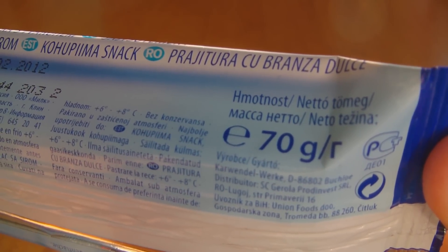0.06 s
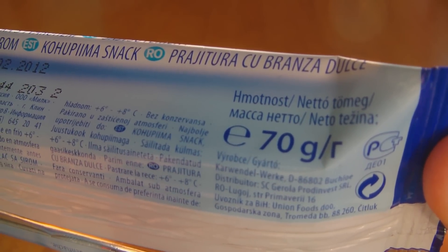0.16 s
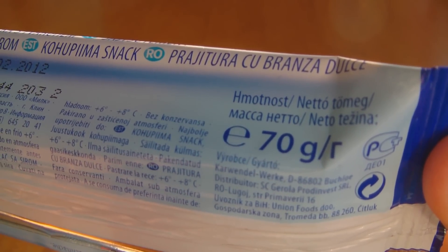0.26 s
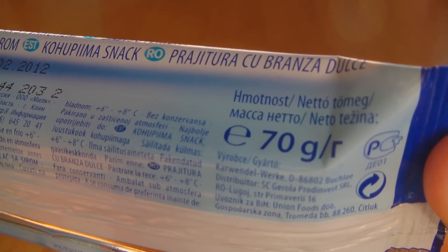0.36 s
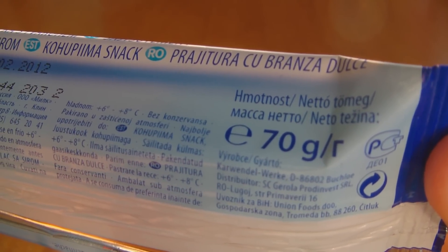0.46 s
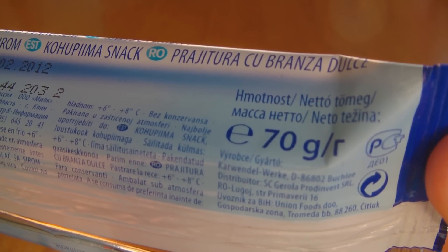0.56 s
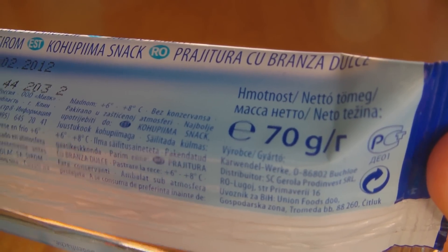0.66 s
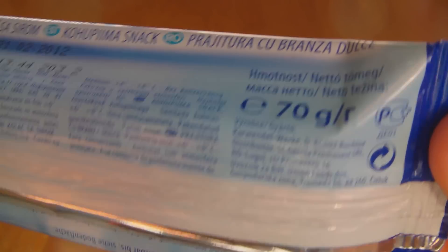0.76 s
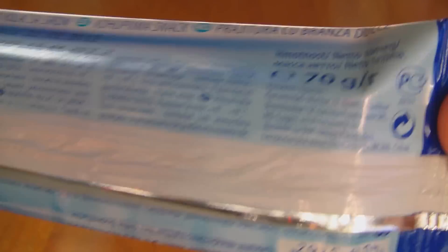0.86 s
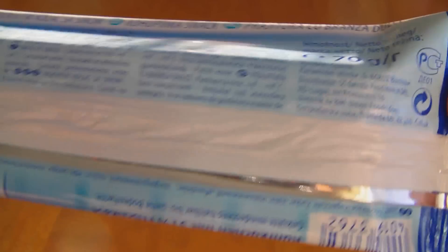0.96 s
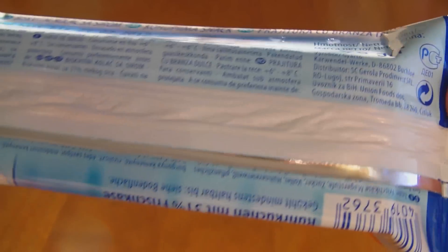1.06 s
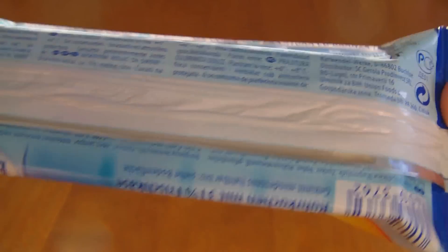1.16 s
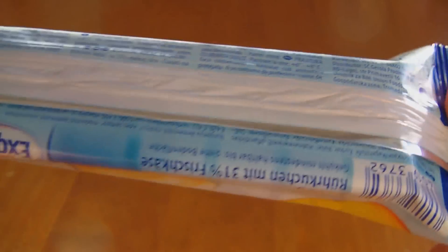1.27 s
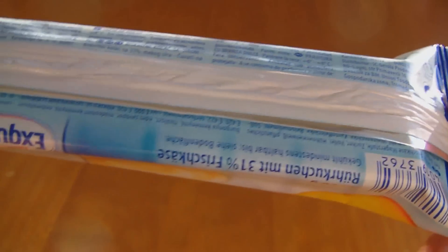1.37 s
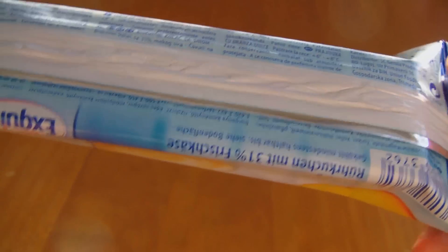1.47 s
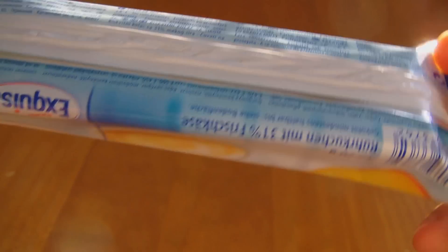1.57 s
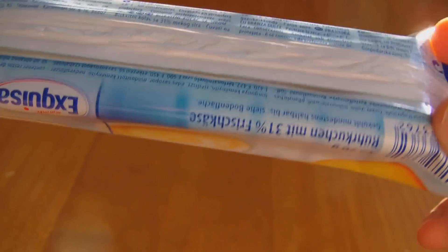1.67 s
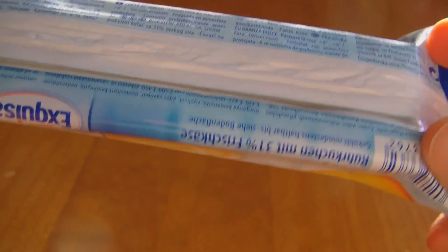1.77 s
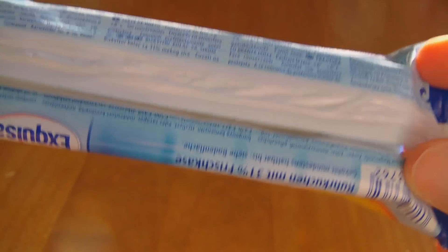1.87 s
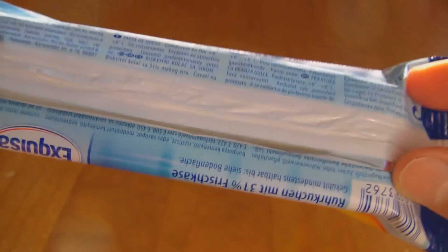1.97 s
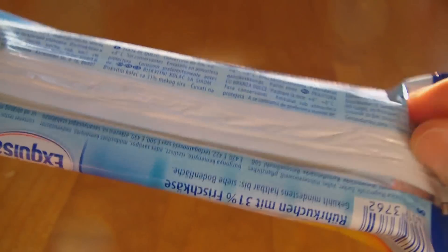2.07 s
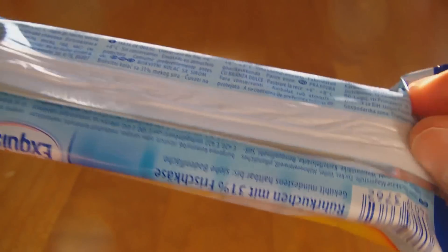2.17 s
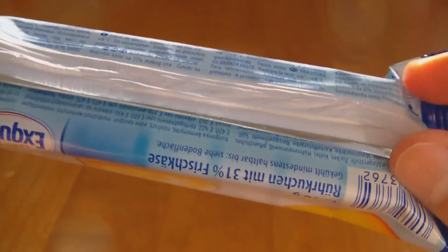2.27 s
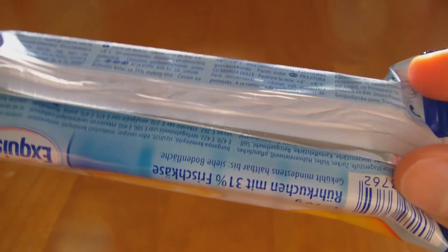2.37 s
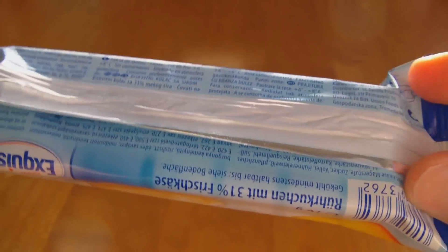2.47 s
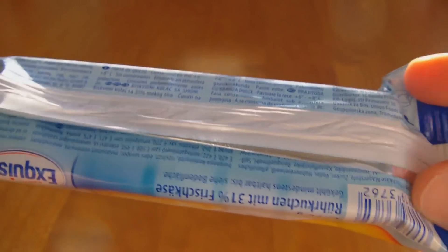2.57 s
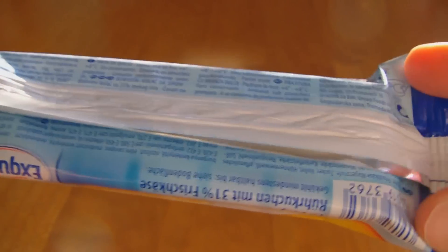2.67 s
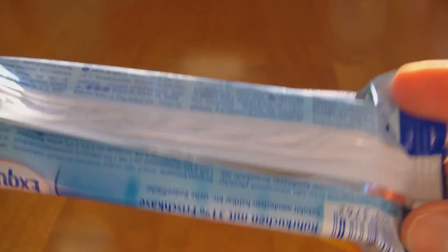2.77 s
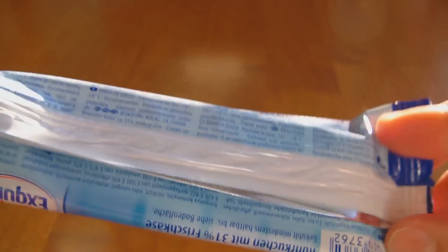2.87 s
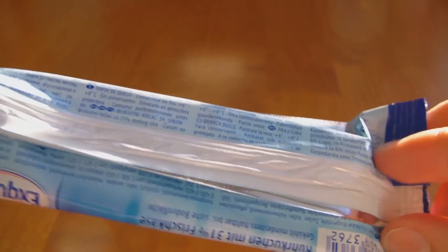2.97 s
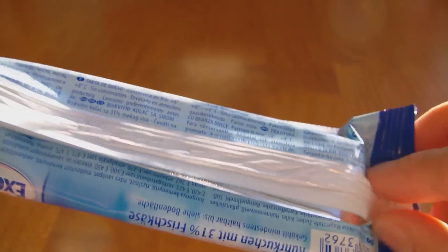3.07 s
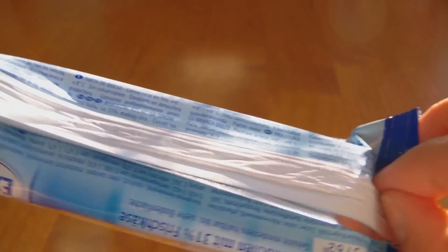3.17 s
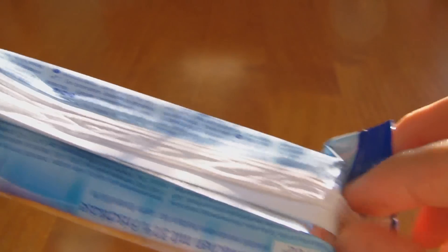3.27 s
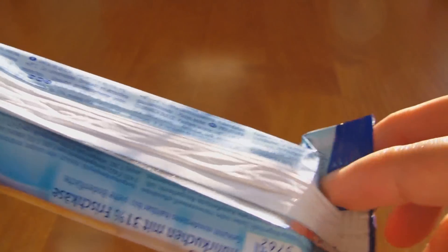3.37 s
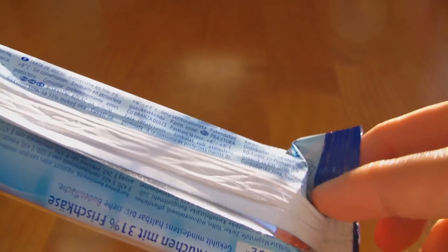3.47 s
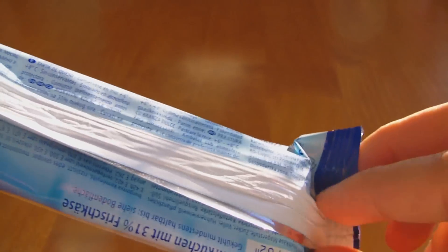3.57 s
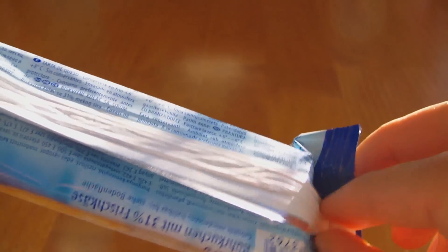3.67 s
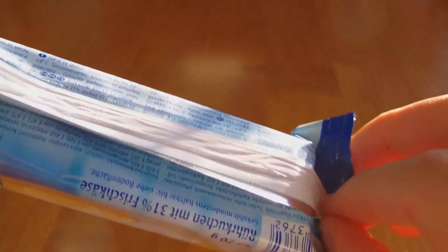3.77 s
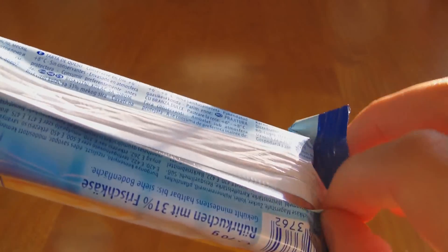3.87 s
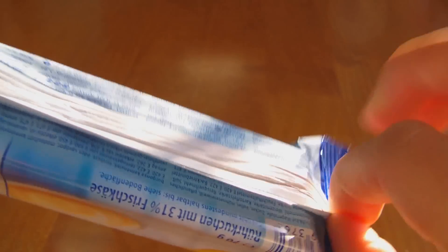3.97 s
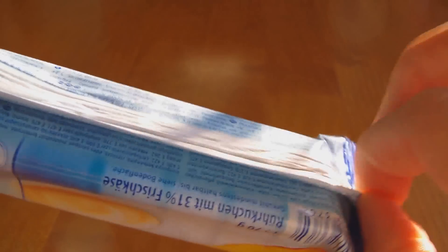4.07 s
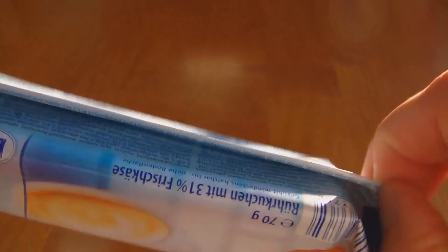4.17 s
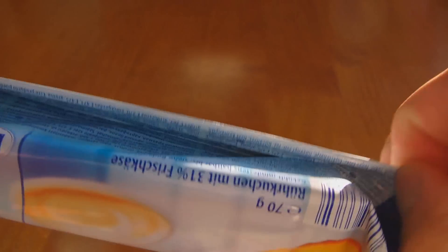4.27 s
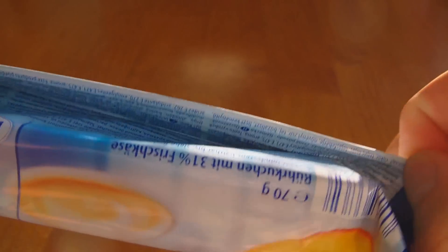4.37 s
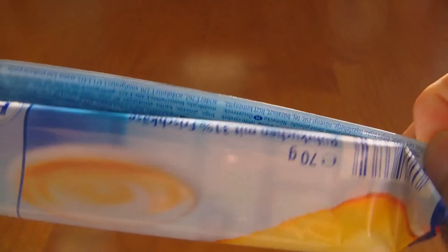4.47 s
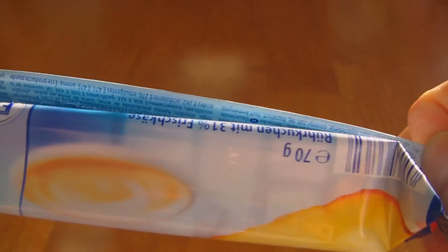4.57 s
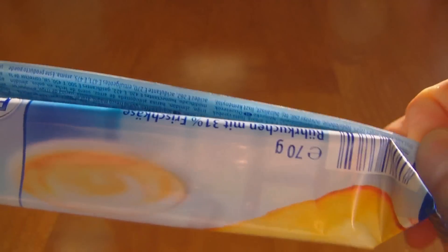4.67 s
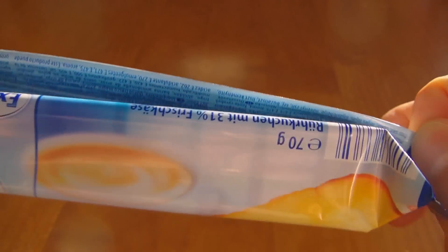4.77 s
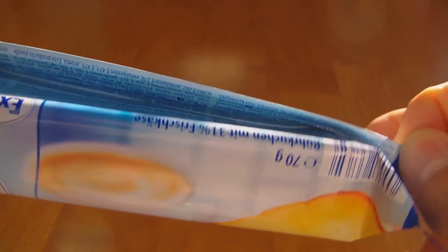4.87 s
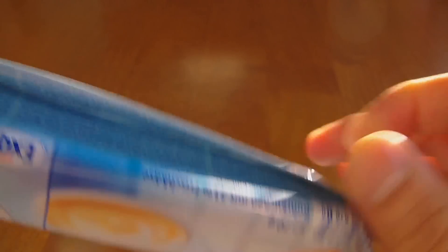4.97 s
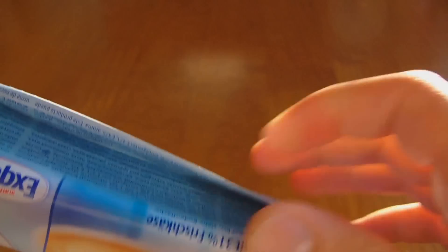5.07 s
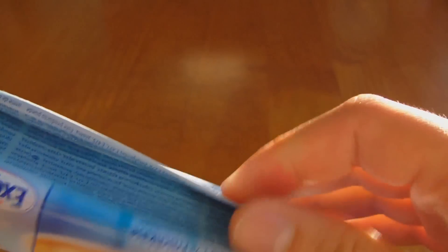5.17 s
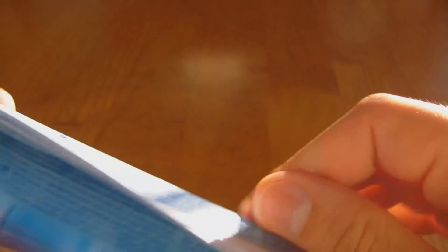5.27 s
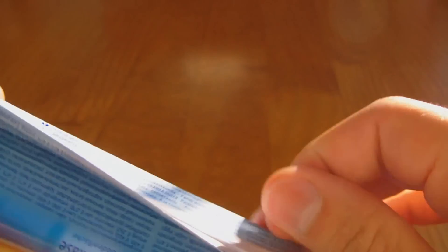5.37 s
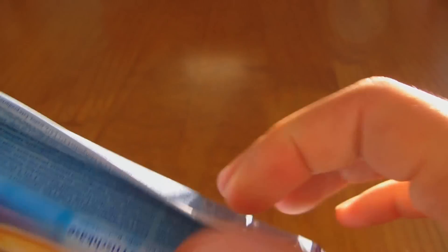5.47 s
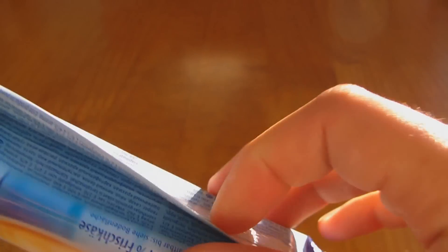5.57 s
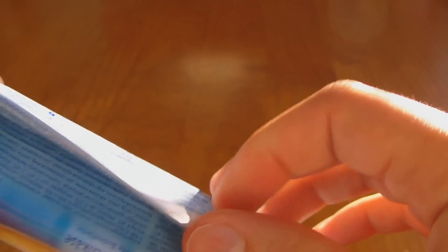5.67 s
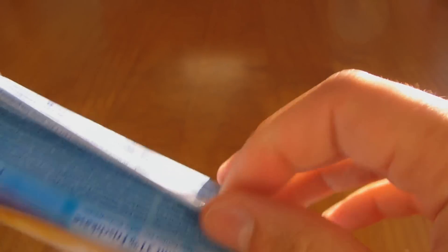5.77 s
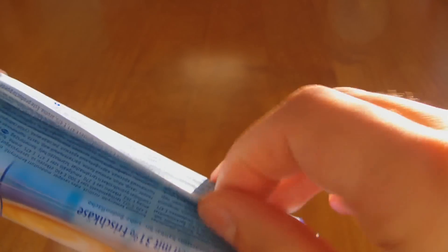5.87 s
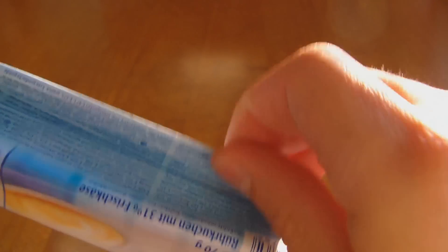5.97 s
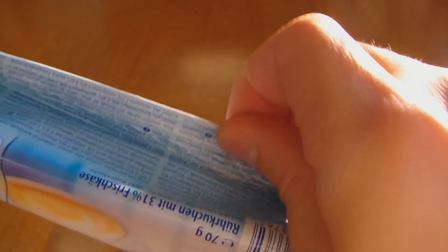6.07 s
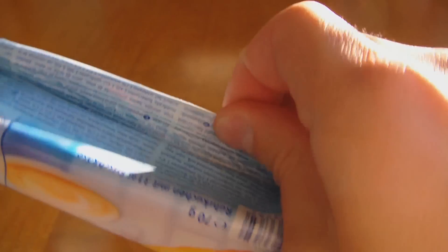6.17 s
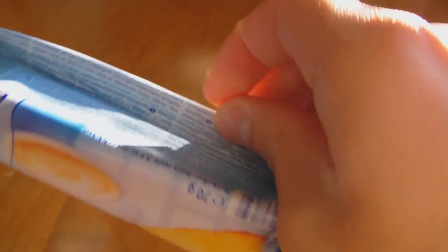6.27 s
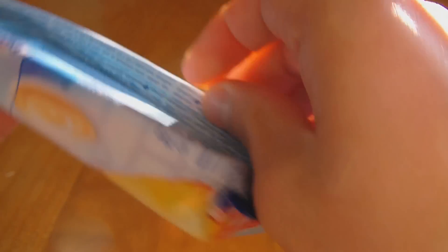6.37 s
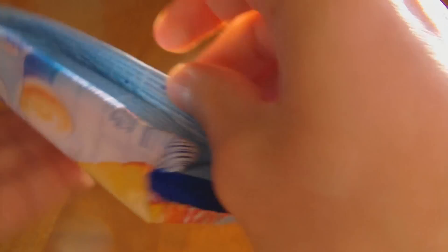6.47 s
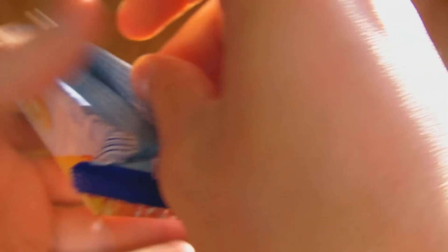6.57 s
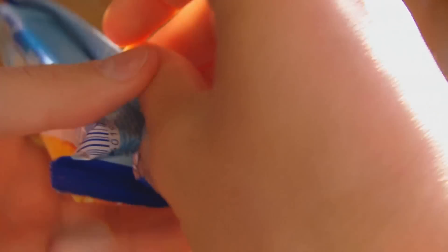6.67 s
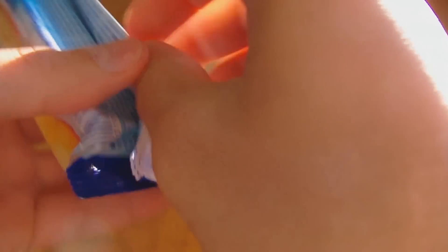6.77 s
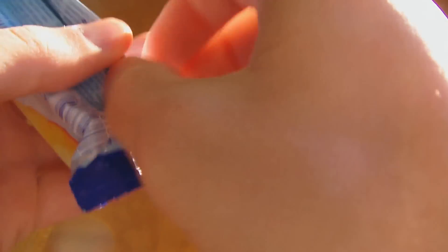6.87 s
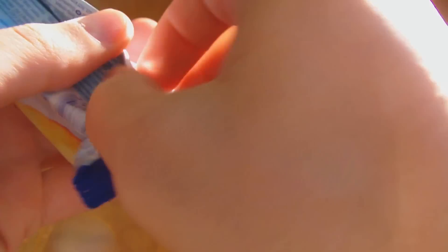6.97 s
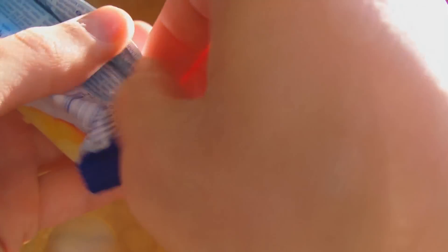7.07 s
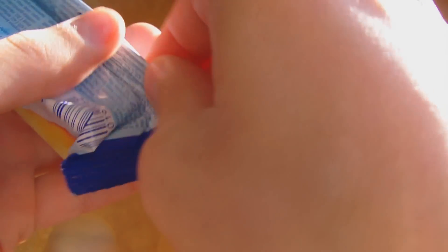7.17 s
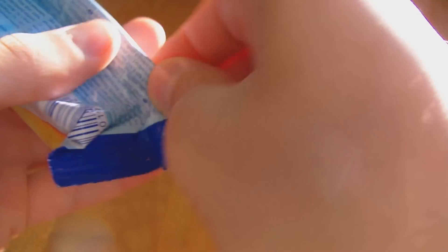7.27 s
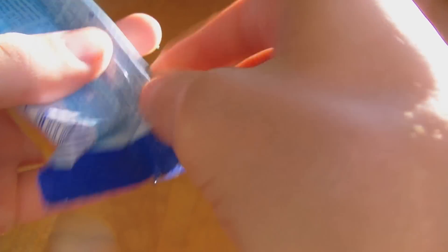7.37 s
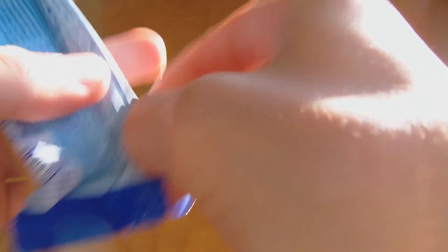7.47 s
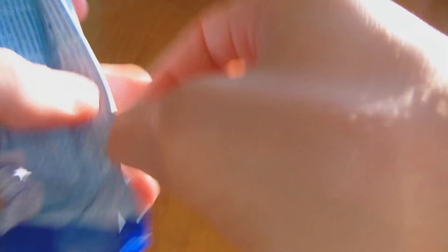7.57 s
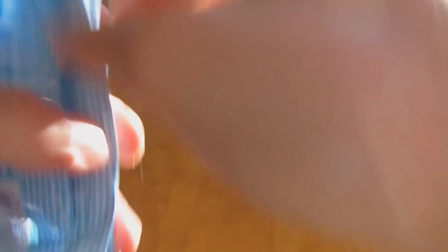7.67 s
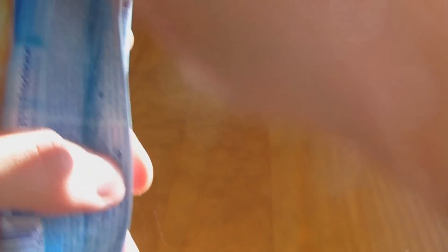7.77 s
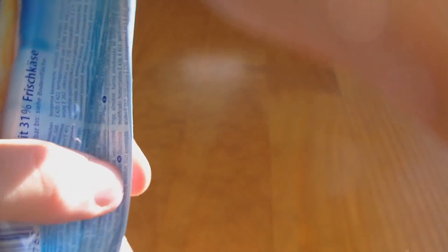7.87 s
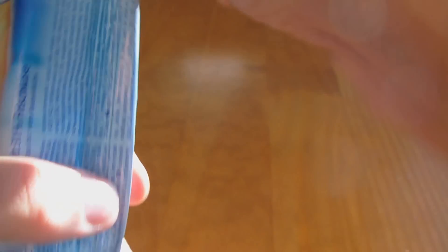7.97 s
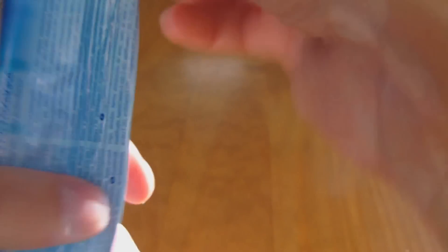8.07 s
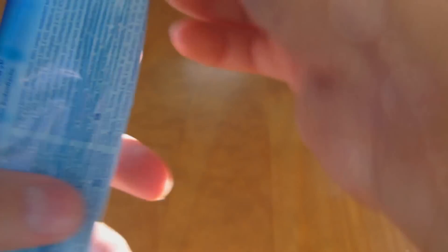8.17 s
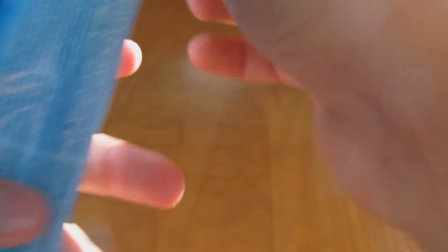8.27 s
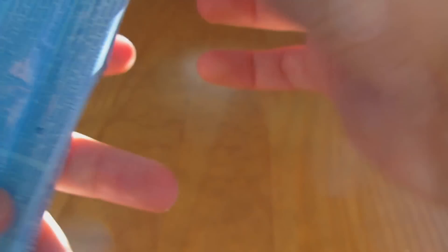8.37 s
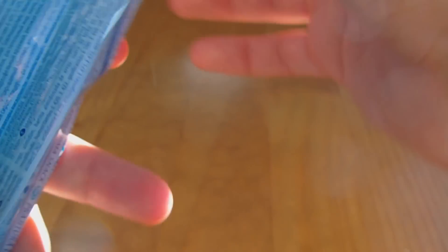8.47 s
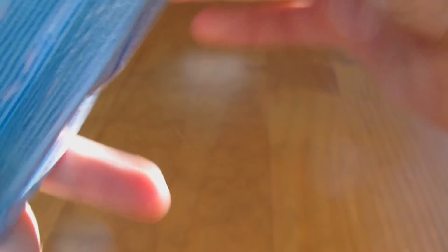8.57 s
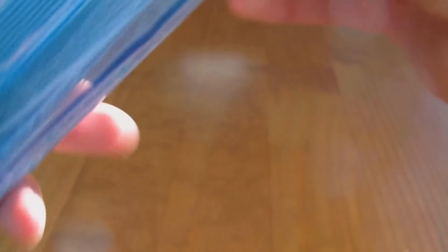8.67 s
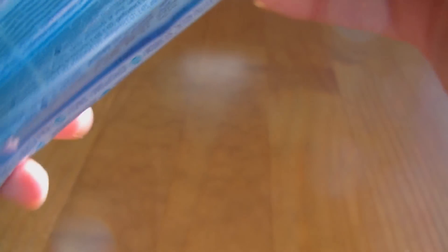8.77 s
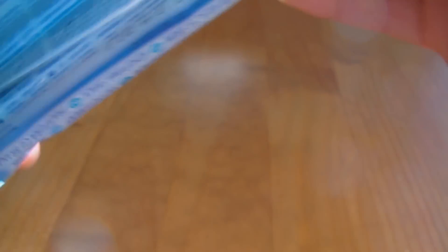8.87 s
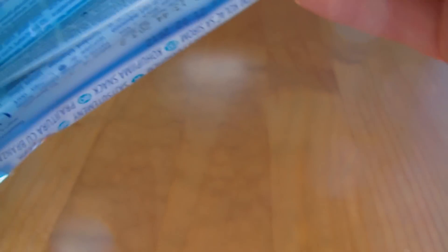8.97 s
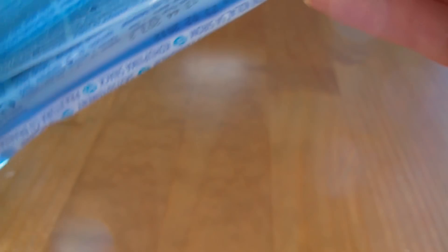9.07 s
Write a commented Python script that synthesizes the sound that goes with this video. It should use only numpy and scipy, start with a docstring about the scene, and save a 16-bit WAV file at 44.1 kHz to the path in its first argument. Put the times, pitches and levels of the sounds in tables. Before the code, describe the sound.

A stiff plastic snack wrapper is turned over by hand, close to the microphone in a quiet room. The first second holds only faint hiss and a tiny tap at 0.5 seconds. From 1 second, creases buckle in sharp, irregular snaps, over a soft rustle of sliding fingers with many tiny ticks. The snaps bunch between 2 and 2.5 seconds, then thin to lighter crackles. A dense, louder flurry runs from 4 to 4.6 seconds, with faint low thumps beneath. Scattered crinkles follow, with a soft thump at 5.3 seconds and small clusters around 5.6, 6.1 and 7.3 seconds. Another soft thump near 7.9 seconds leads into busy crackling around 8.1 and 8.7 seconds, ending in a few light ticks just after 9 seconds. Slight room reflections and a barely audible low hum remain throughout.

```python
"""A stiff plastic snack wrapper, turned over by hand close to a microphone in a quiet room.
Creases buckle with sharp snaps: bursts of slips ring the film's facets and the air-filled pouch.
Sliding fingers rustle with skin hiss and many tiny ticks; a faint tap and low thumps lie underneath.
The walls send a little back, over room and microphone hiss and a faint low hum."""
import sys
import numpy as np
from scipy import signal
from scipy.fft import rfft, irfft
from scipy.io import wavfile
from scipy.ndimage import uniform_filter1d

SR = 44100
rng = np.random.default_rng(int(sys.argv[2]) if len(sys.argv) > 2 else 0)


def inscribe(sig):
    """Save sig as 16-bit PCM at rate SR to the path in sys.argv[1].

    A 1-D sig is mono; a 2-D sig holds one channel per row.
    Samples are clipped to [-1, 1] before scaling.
    """
    pcm = np.round(np.clip(np.atleast_2d(sig).T, -1, 1) * 32767)
    wavfile.write(sys.argv[1], SR, pcm.astype(np.int16))


N = 402633
SNAP_RISE_S = 0.00015


def gain_of(db):
    """dB to amplitude."""
    return 10 ** (np.asarray(db) / 20)


def unit_rms(x):
    """Scale to rms 1."""
    return x / np.sqrt(np.mean(x ** 2) + 1e-20)


def curve_at(points, hz):
    """Interpolate (Hz, value) points over log frequency."""
    point_hz, value = np.transpose(points)
    return np.interp(np.log(hz + 1), np.log(point_hz + 1), value)


def add(mix, start_s, sound):
    """Mix a sound in at start_s."""
    part = mix[round(start_s * SR):][:len(sound)]
    part += sound[:len(part)]


def octaves(hz):
    """Octaves above 3 kHz, limited to the film's range."""
    return np.log2(np.clip(hz, 120, 15000) / 3000)


def minimum_phase(db):
    """Causal spectrum for a gain curve in dB."""
    log_gain = np.log(gain_of(db))
    mirrored = np.concatenate([log_gain, log_gain[..., -2:0:-1]], -1)
    return np.exp(log_gain - 1j * signal.hilbert(mirrored).imag[..., :log_gain.shape[-1]])


def mode(hz, centre_hz, width_hz):
    """Response of one damped mode, 1 at its peak."""
    return 1 / (1 + 2j * (hz - centre_hz) / width_hz)


def buckle(ring_hz, fall_db_per_oct, rise_s):
    """Slips ring facets and pouch. One snap a row, each with the energy of 1 ms at rms 1."""
    # Colour of an average snap. Each row: frequency in Hz, level in dB.
    film_colour = [(80, -47), (300, -19), (640, -7.5), (1010, -6.5), (1610, -4), (2560, -1), (4070, -2),
                   (6460, -6), (10280, -13.5), (15000, -20), (15500, -38.5)]
    # Mode of the air-filled wrapper. Each row: centre in Hz, width in Hz, mean coupling in dB.
    pouch_modes = [(2194, 150, -1)]
    ring_hz, fall_db_per_oct, rise_s = ring_hz[:, None], fall_db_per_oct[:, None], rise_s[:, None]
    hz, t = np.fft.rfftfreq(1024, 1 / SR), np.arange(1024) / SR
    draws = rng.standard_normal((len(ring_hz), 1030 + len(pouch_modes)))
    grit, scatter = draws[:, :1024], draws.T[1024:, :, None]
    decay_s = 0.0003 * np.exp(0.45 * scatter[0]) + rise_s / 4  # some give at once, others roll over
    burst = np.minimum(t / rise_s, 1) * np.exp(-np.maximum(t - rise_s, 0) / decay_s)
    settling = gain_of(-16 + 4 * scatter[2]) * np.exp(-t / 0.003)
    slips = grit * burst + grit ** 3 / 4 * settling  # the film settles in uneven jerks
    body = 1 + 1.5 * mode(hz, ring_hz, 0.4 * ring_hz)
    for k in range(3):  # neighbouring facets of random size
        facet_hz = 3500 * np.exp(0.64 * scatter[3 + k])
        body += (-1) ** k * 1.1 * mode(hz, facet_hz, 0.18 * facet_hz)
    for k, (centre_hz, width_hz, coupling_db) in enumerate(pouch_modes):
        body += gain_of(coupling_db + 4 * scatter[6 + k]) * mode(hz, centre_hz, width_hz)
    away_oct = np.minimum(abs(octaves(hz) - octaves(ring_hz)), 3.5)
    # Thin film never gains bass.
    fall_db = np.where(hz < ring_hz, abs(fall_db_per_oct), fall_db_per_oct) * away_oct
    colour = minimum_phase(curve_at(film_colour, hz) - fall_db)
    fade = np.cos(np.pi / 2 * t / t[-1]) ** 2
    shapes = irfft(rfft(slips) * body * colour) * fade
    return shapes / np.linalg.norm(shapes, axis=1, keepdims=True) * np.sqrt(SR / 1000)


def creases():
    """Creases buckling one by one: sharp snaps, slower rolls and light ticks."""
    # Creases that give at once. Each row: start in seconds, energy in dB, facet ring in Hz,
    # fall away from the ring in dB per octave.
    snaps = [(1.0457, -18.5, 2620, 1), (1.1192, -26, 900, -2.5), (1.1397, -31, 845, 4.5),
             (1.2767, -20, 3700, 3), (1.327, -34, 1170, 5.5), (1.7238, -31, 10900, 2),
             (1.7455, -33.5, 2140, 13), (1.9116, -32, 860, 3), (2.0246, -21, 11200, -1.5),
             (2.089, -30.5, 1090, 20), (2.149, -28, 1380, 8), (2.1624, -31.5, 750, 7),
             (2.224, -19, 2410, -1.5), (2.2261, -16.5, 3140, -4.5), (2.2327, -35, 4500, 0),
             (2.2534, -26, 10470, 1), (2.2844, -27.5, 7140, 3.5), (2.4649, -15, 3800, 5),
             (2.537, -27.5, 2330, 3), (2.6975, -31, 7500, 2.5), (2.843, -30.5, 11040, 3.5),
             (2.9006, -28, 11000, 3.5), (2.9072, -21, 11790, 3), (2.934, -30, 4500, 0),
             (3.013, -33.5, 11100, 0.5), (3.0402, -28, 3750, 0.5), (3.0843, -26.5, 2880, 14.5),
             (3.1985, -23.5, 7040, 1.5), (3.2547, -31, 11400, -2), (3.3725, -34, 6800, 5),
             (3.3914, -29, 1300, 3.5), (3.4793, -29.5, 1120, 0.5), (3.6728, -26.5, 4900, 1),
             (3.9387, -31, 11000, 0.5), (4.052, -23, 2500, -1.5), (4.054, -19.5, 2750, -7.5),
             (4.0632, -30, 5400, 1), (4.097, -22.5, 3050, 1), (4.1114, -23, 11000, 1),
             (4.143, -27, 870, 2.5), (4.1499, -20, 1330, 3), (4.197, -26.5, 1420, 5),
             (4.213, -20.5, 4770, 0), (4.2432, -20.5, 1570, 5), (4.2611, -18.5, 9250, 0),
             (4.267, -19.5, 9900, 1), (4.284, -25, 9400, 10), (4.3376, -14, 3200, 4.5),
             (4.3567, -23, 6560, 9), (4.3807, -23, 3100, 8), (4.3869, -20, 11200, -0.5),
             (4.398, -24.5, 9970, -3), (4.4759, -21.5, 6000, 1), (4.5331, -23.5, 11100, -2),
             (4.5412, -19.5, 9300, -2.5), (4.5598, -25.5, 10470, 1), (4.7394, -20.5, 1480, 0.5),
             (4.8336, -29, 9300, 4.5), (5.0115, -26, 9300, 2), (5.0394, -24, 2100, 1),
             (5.3646, -31.5, 1460, 1), (5.419, -28, 6530, 0.5), (5.5624, -27, 4300, -0.5),
             (5.622, -23, 1270, 3), (5.6377, -30.5, 1870, 20), (5.6737, -18, 1910, 1),
             (5.749, -29.5, 626, -2), (5.9781, -36.5, 720, 1), (5.9935, -28, 2000, 6),
             (6.0102, -29.5, 7700, 2), (6.034, -27.5, 2820, -2), (6.0387, -18.5, 11800, 5.5),
             (6.0462, -23.5, 3560, 13), (6.0827, -30.5, 1640, 3), (6.114, -29, 940, 1),
             (6.1436, -17.5, 4020, 2), (6.183, -30, 710, 2), (6.4898, -30.5, 2600, 3),
             (6.5077, -30, 2100, 6), (6.5267, -30, 1320, 12.5), (6.5336, -33, 2690, 2),
             (6.5422, -24.5, 9800, 4), (6.838, -25.5, 730, 1), (6.868, -18.5, 9800, 0),
             (6.9673, -26, 6400, 1.5), (7.133, -20.5, 7300, 0.5), (7.1825, -32, 11000, -0.5),
             (7.188, -28, 6800, 0.5), (7.2581, -35, 836, 8), (7.2755, -22, 6500, 5),
             (7.278, -28.5, 4194, 8), (7.3395, -25.5, 2160, 0), (7.3973, -29, 890, 5),
             (7.402, -29, 2980, 7), (7.643, -29.5, 1420, 5), (7.737, -26.5, 7500, 2.5),
             (7.8466, -31, 2170, 2), (7.8511, -21, 960, 5), (7.8731, -30.5, 8200, 4),
             (7.9294, -27, 950, -0.5), (7.9422, -31, 1260, 2), (8.001, -33.5, 9030, -0.5),
             (8.0206, -33, 1730, 3), (8.0288, -31, 1460, 5), (8.0346, -17, 5850, 3),
             (8.043, -34, 3050, -7.5), (8.0782, -21, 3000, -5), (8.0802, -19, 6100, 9),
             (8.093, -20.5, 11200, 4), (8.1051, -32, 2400, 3), (8.111, -19.5, 5000, 11),
             (8.1138, -22.5, 2400, -2.5), (8.1186, -20, 7540, 4), (8.1354, -24, 11000, 0),
             (8.141, -30, 600, -1), (8.1483, -22, 566, 1), (8.1685, -30, 4640, 4),
             (8.3177, -32.5, 1960, 17), (8.3502, -27.5, 1010, 6), (8.416, -23, 8700, 0),
             (8.6394, -17, 2080, 1), (8.656, -26, 3570, -4), (8.6604, -23.5, 2040, 0),
             (8.667, -28, 2400, -1), (8.6862, -33, 2280, 0), (8.7039, -19.5, 6700, 2.5),
             (8.708, -23, 5250, 0), (8.7155, -28.5, 1490, 10), (8.728, -28, 3330, -3.5),
             (8.7429, -26, 8700, 3), (8.7883, -24, 10300, 1.5), (8.81, -31, 7410, -1),
             (8.9349, -25, 8200, 1), (8.962, -31.5, 3730, 5.5), (9.0942, -32, 8800, 1)]
    # Creases that roll along the film first. Each row: as for snaps, then rise in seconds.
    rolls = [(2.1265, -20, 1480, 0, 0.0027), (2.395, -29, 2000, -1, 0.0072),
             (4.043, -15.5, 2960, -0.5, 0.0066), (4.324, -21.5, 11100, 3.5, 0.0019),
             (5.323, -22, 2520, -1.5, 0.0024), (6.3435, -22.5, 2020, -1.5, 0.0033),
             (6.392, -34, 2730, 10, 0.0078), (7.3876, -18.5, 2050, 1, 0.003),
             (8.627, -28.5, 3020, 0, 0.0036)]
    # Small facets. Each row: start in seconds, peak in dB.
    ticks = [(1.032, -40), (1.1987, -26), (1.2352, -27.5), (1.3174, -33), (1.8589, -28.5), (2.1041, -32),
             (2.1749, -29), (2.1862, -28), (2.2171, -36), (2.4108, -29.5), (2.5157, -28.5), (2.5879, -31),
             (2.6355, -33.5), (2.866, -33), (2.8962, -25.5), (3.1655, -28), (3.2077, -29), (3.3386, -26),
             (3.6067, -39), (3.6238, -30), (3.8065, -26.5), (3.8223, -37), (3.876, -37), (4.0224, -30.5),
             (4.6878, -28.5), (4.7647, -27), (4.8408, -34), (4.9674, -32), (5.2206, -38.5), (5.8827, -34.5),
             (5.9653, -36), (6.2412, -38), (6.2543, -33), (6.281, -28.5), (6.3022, -37), (6.4949, -33),
             (6.5206, -29), (6.5985, -36), (6.6863, -35), (6.7206, -40.5), (6.7621, -37.5), (6.8822, -33),
             (6.9909, -33), (7.0218, -28), (7.0322, -34.5), (7.1615, -28.5), (7.2292, -37), (7.2935, -33),
             (7.4535, -33), (7.6206, -27.5), (7.6599, -39), (7.8211, -29.5), (7.8327, -29), (8.1816, -29),
             (8.3298, -26), (8.3597, -34), (8.3803, -28), (8.4081, -37), (8.4848, -38), (8.4972, -30),
             (8.5057, -36), (8.5274, -36), (8.7653, -30), (8.9134, -29), (9.0881, -31)]
    out = np.zeros(N)
    rows = [row + (SNAP_RISE_S,) for row in snaps] + rolls
    starts_s, energies_db, ring_hz, fall_db_per_oct, rise_s = np.transpose(rows)
    shapes = buckle(ring_hz, fall_db_per_oct, rise_s)
    for start_s, energy_db, shape in zip(starts_s, energies_db, shapes):
        add(out, start_s, gain_of(energy_db) * shape)
    pitch, fall = rng.random((len(ticks), 2)).T
    shapes = buckle(1200 * 4 ** pitch, 4 * fall, np.full(len(ticks), SNAP_RISE_S))
    for (start_s, peak_db), shape in zip(ticks, shapes):
        add(out, start_s, gain_of(peak_db) * shape / abs(shape).max())
    return out


def sliding(t):
    """Amplitude and tilt in dB per octave of finger strokes that swell, hold and die away."""
    # Each row: start of hold in seconds, hold in seconds, level in dB, tilt in dB per octave.
    strokes = [(.95, 0.19, -65.5, 1.5), (1.05, 0.26, -61.5, 1.5), (1.495, 0.25, -59.5, 2.5),
               (1.649, 0.1, -54.5, 1.5), (1.87, 0.11, -62, 0), (2.035, 0.27, -56.5, -0.5),
               (2.31, 0.538, -62, 1.5), (2.89, 0.067, -58, 3), (3.02, 0.24, -62, 1),
               (3.369, 0.033, -49.5, 3), (3.47, .46, -64, 1), (4.051, 0.07, -52.5, -1),
               (4.21, 0.13, -52, 0), (4.52, 0.061, -57, -1.5), (4.661, 0.19, -58, 0), (4.9, 0.12, -56.5, 0),
               (5.1, 0.2, -67, 2.5), (5.286, 0.079, -49, 2), (5.4, 0.12, -66, 2), (5.63, 0.098, -58.5, -1),
               (5.8, 0.11, -68, 1.5), (5.96, 0.16, -67.5, -1.5), (6.15, 0.078, -56.5, 0.5),
               (6.32, 0.26, -55, 0), (6.67, 0.26, -61.5, 3), (6.839, 0.52, -58.5, 2), (7.1, 0.17, -64, -1),
               (7.391, 0.06, -56.5, -0.5), (7.589, 0.046, -51, 3), (7.83, 0.18, -57, 0),
               (8.048, 0.12, -51.5, -1.5), (8.314, 0.053, -50.5, 0.5), (8.43, 0.096, -58.5, -0.5),
               (8.65, 0.072, -54.5, -1.5), (8.76, 0.14, -63.5, 1.5), (8.889, 0.044, -52, 0.5)]
    start_s, hold_s, level_db, tilt_db_per_oct = np.transpose(strokes)[:, :, None]
    rise_db_per_s = 524 / (1.5 + 2 * hold_s * np.maximum(tilt_db_per_oct, 0))  # long, bright: eases in
    release_db_per_s = 372
    before_s, after_s = np.maximum(start_s - t, 0), np.maximum(t - start_s - hold_s, 0)
    power = gain_of(level_db - rise_db_per_s * before_s - release_db_per_s * after_s) ** 2
    return np.sqrt(power.sum(0)), (power * tilt_db_per_oct).sum(0) / power.sum(0)


def rustle(ticks_per_s=250, patchy_db=3, grip_db=2.1):
    """Skin sticks and slips on the film: hiss, plus tiny creases that bunch when it grips."""
    frames, hz = N // 64 + 5, np.fft.rfftfreq(256, 1 / SR)
    t, frame_s = np.arange(N) / SR, np.arange(frames) * 64 / SR
    # Skin hiss. Each row: frequency in Hz, level in dB.
    skin_colour = [(100, -35), (500, -1.5), (2200, -1), (4000, -3.5), (8000, -10.5), (15000, -21.5),
                   (15500, -33.5)]
    strength, tilt_db_per_oct = sliding(frame_s)
    real, imag, patches = rng.standard_normal((frames, 129, 3)).T
    patches = uniform_filter1d(patches, size=9, axis=0)
    patches = unit_rms(uniform_filter1d(patches, size=14, axis=1))
    grip = unit_rms(uniform_filter1d(rng.standard_normal(frames), size=5))
    colour_db = curve_at(skin_colour, hz)[:, None] + octaves(hz)[:, None] * tilt_db_per_oct
    spectra = (real + 1j * imag) * gain_of(colour_db + patchy_db * patches + grip_db * grip)
    hiss = unit_rms(signal.istft(spectra, nperseg=256, noverlap=192)[1][:N])

    shapes = buckle(np.geomspace(700, 9000, 24), rng.uniform(0, 7, 24), np.full(24, SNAP_RISE_S))
    bunching = np.interp(t, frame_s, np.exp(grip - 0.5))
    size_db = 5.5 * np.minimum(rng.exponential(1, N), 2.7)
    impulses = gain_of(size_db) * (rng.random(N) < ticks_per_s / SR * bunching)
    kind = rng.integers(0, len(shapes), N)
    ticks = sum(signal.oaconvolve(impulses * (kind == k), shape)[:N] for k, shape in enumerate(shapes))
    # A bright, light slide creases the film less.
    tick_gain_db = -1 - 3 * np.interp(t, frame_s, np.clip(tilt_db_per_oct, 0, 4))
    return np.interp(t, frame_s, strength) * (hiss + gain_of(tick_gain_db) * ticks)


def tap_and_thumps():
    """A faint tap, a brief low pulse under the loud snap at 2.226 s, then faint low thumps; a few cycles each."""
    # Each row: centre in seconds, envelope peak in dB, pitch in Hz.
    pulses = [(.497, -59.5, 1430), (2.226, -64, 101), (4.046, -60, 171), (4.218, -62, 220),
              (4.388, -52, 305), (4.533, -48.5, 252), (4.99, -63, 174), (5.326, -47, 226),
              (7.853, -47.5, 370)]
    out = np.zeros(N)
    for centre_s, peak_db, hz in pulses:
        cycles = np.arange(-5, 5, hz / SR)
        width_cycles = 0.6 + hz / 700
        envelope = gain_of(peak_db) * np.exp(-(cycles / width_cycles) ** 2)
        add(out, centre_s - 5 / hz, envelope * np.sin(2 * np.pi * cycles))
    return out


def room(x, level_db=-18, onset_s=0.0023):
    """Wall reflections: a dense tail that dies sooner in the treble."""
    # Each row: frequency in Hz, time to fall 60 dB in seconds.
    decay_times = [(300, 0.62), (2000, 0.29), (8000, 0.23)]
    hz, t, spectra = signal.stft(rng.standard_normal(SR // 2), SR, nperseg=256)
    decay = gain_of(-60 * t / curve_at(decay_times, hz)[:, None])
    tail = signal.istft(spectra * decay, SR, nperseg=256)[1]
    tail *= np.clip(np.arange(len(tail)) / SR / onset_s, 0, 1)
    tail *= gain_of(level_db) / np.linalg.norm(tail)
    return signal.oaconvolve(x, tail)[:N]


def background(hiss_db=-73):
    """Steady room and microphone hiss over a low hum."""
    # Each row: frequency in Hz, relative level in dB.
    hiss_colour = [(40, -20), (60, -21), (110, -17), (200, -4.5), (600, 0), (1400, -3.5), (2500, -8.5),
                   (7000, -13.5), (15100, -13.5), (15400, -22)]
    # Two tones that beat slowly. Each row: frequency in Hz, rms level in dB.
    hum_tones = [(32.1, -101), (32.57, -99)]
    colour = gain_of(curve_at(hiss_colour, np.fft.rfftfreq(N, 1 / SR)))
    hiss = irfft(rfft(rng.standard_normal(N)) * colour, N)
    t = np.arange(N) / SR
    hum = sum(gain_of(db) * np.sqrt(2) * np.sin(2 * np.pi * hz * (t - 0.5)) for hz, db in hum_tones)
    return gain_of(hiss_db) * unit_rms(hiss) + hum


def scene():
    """The wrapper in the room, mono."""
    wrapper = creases() + rustle()
    return (wrapper + room(wrapper) + tap_and_thumps() + background())[None]


def record(dry):
    """A narrow treble notch, then a low-pass."""
    notch_hz, notch_width_hz, cutoff_hz = 7870, 200, 16500
    notched = signal.lfilter(*signal.iirnotch(notch_hz, notch_hz / notch_width_hz, SR), dry)
    lowpass = signal.firwin(511, cutoff_hz, window=("kaiser", 9), fs=SR)
    return signal.oaconvolve(notched, lowpass[None], "same")


dry = scene()
out = record(dry)
inscribe(out)
```